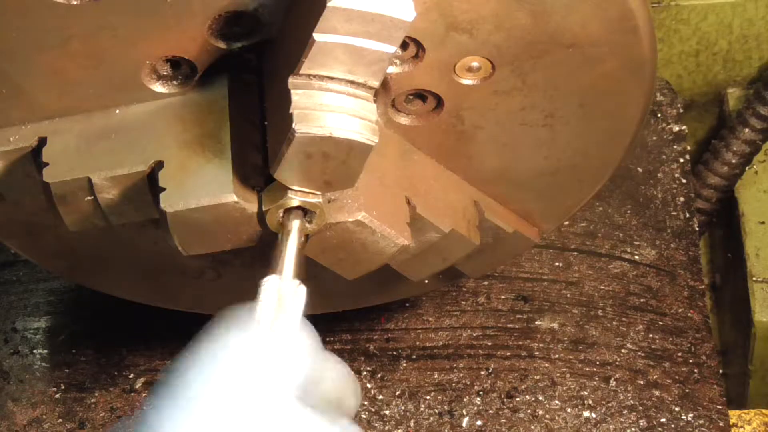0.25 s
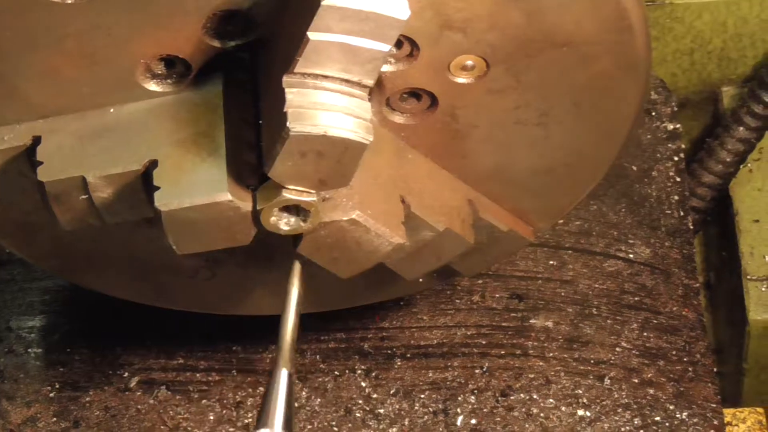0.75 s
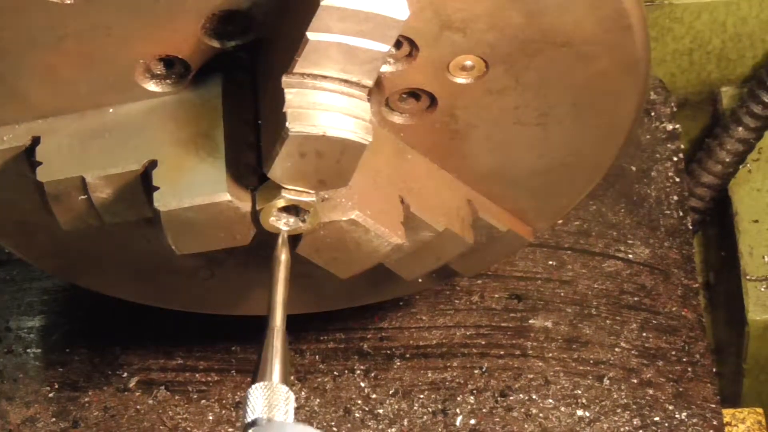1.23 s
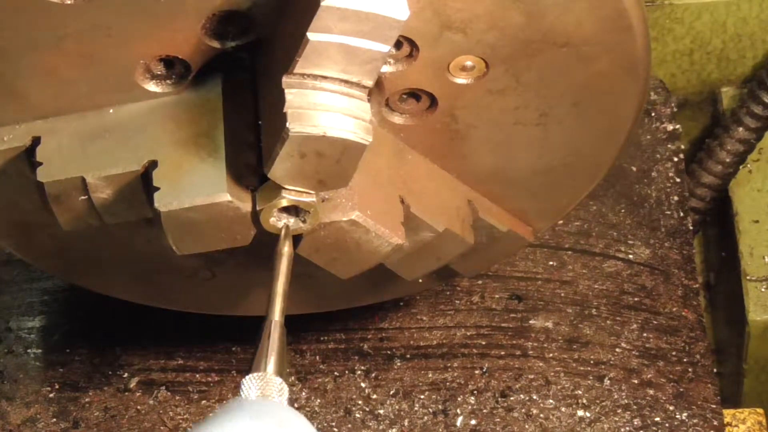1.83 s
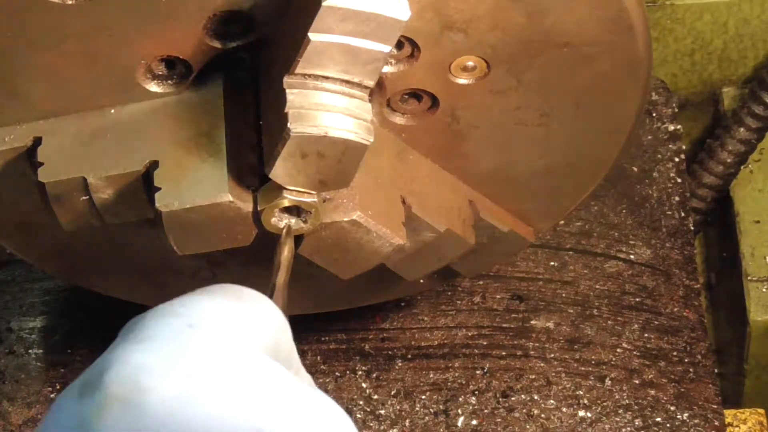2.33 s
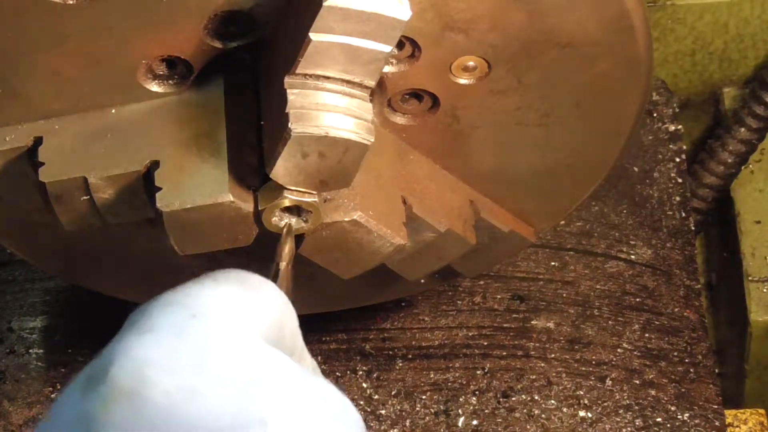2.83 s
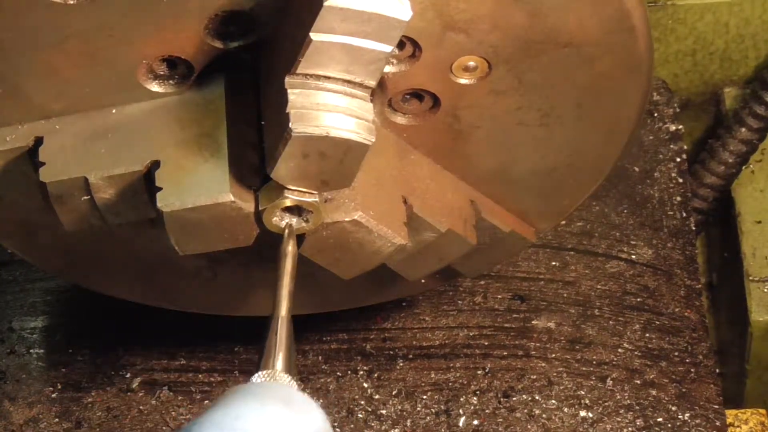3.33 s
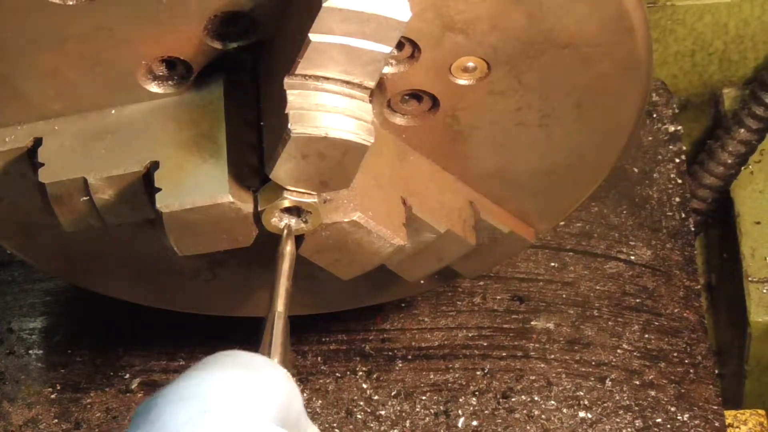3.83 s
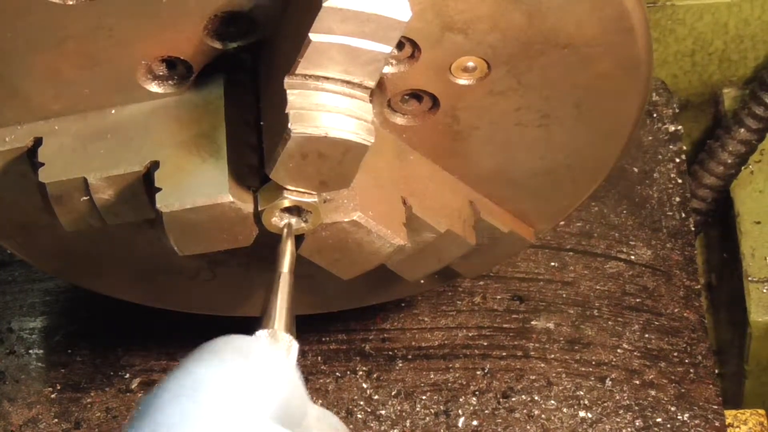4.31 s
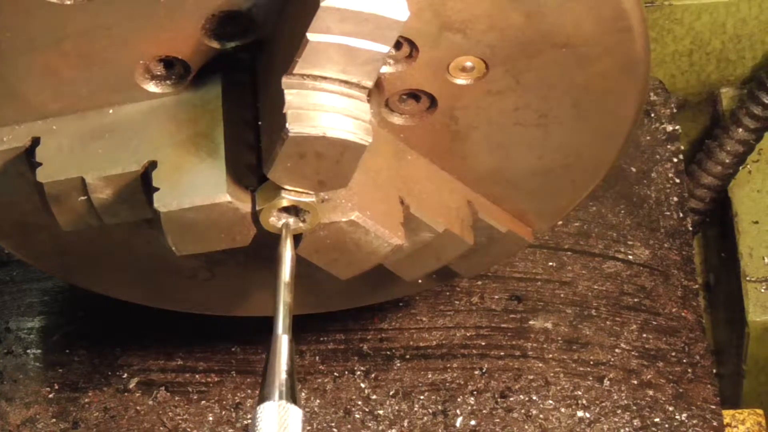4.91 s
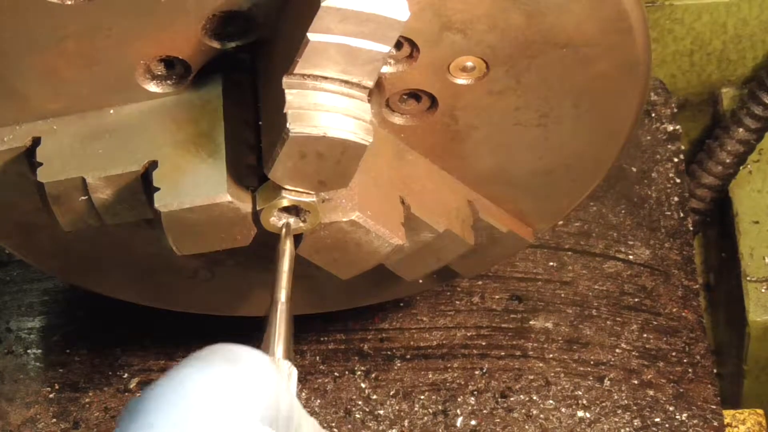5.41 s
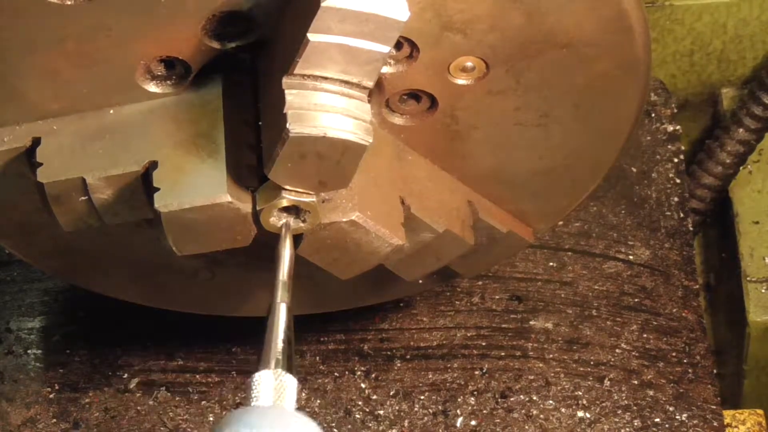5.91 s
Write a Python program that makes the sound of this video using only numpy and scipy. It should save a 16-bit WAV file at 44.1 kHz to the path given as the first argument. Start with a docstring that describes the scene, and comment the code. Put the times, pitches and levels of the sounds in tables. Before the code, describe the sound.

A sharp metallic crack comes early, with a low boom from the lathe bed, then a scrape, a tiny squeak and about a second of faint rattling motor buzz. Small steel taps lead to three more cracks, each followed by the spring clicking back and the shank clicking to its stop. Dull knocks and low hand rustle fill in, close up in a small room with faint hiss.

```python
"""Centre punch in a lathe chuck

An automatic centre punch fires four times on a steel piece: noise bursts through steel resonances.
Each snap rings the chuck (decaying sines and noise) and the small workshop (a diffuse noise tail).
Between snaps the spring resets with clicks, and the tip taps, rubs and squeaks as it is set down again.
A small motor, a train of resonant ticks, buzzes for a second and twice briefly, over air noise and hum."""
import sys
import numpy as np
from scipy import signal
from scipy.fft import rfft, irfft
from scipy.io import wavfile
from scipy.ndimage import uniform_filter1d

SR = 44100
rng = np.random.default_rng(int(sys.argv[2]) if len(sys.argv) > 2 else 0)


def wrap_up_sound(samples):
    """Save the sound to the file named by the first command line argument, as 16-bit audio."""
    columns = np.atleast_2d(samples).T
    # keep every value between -1 and 1, then stretch to whole-number steps
    tamed = np.clip(columns, -1, 1)
    steps = np.round(tamed * 32767).astype(np.int16)
    wavfile.write(sys.argv[1], SR, steps)


N = 271656
TIME = np.arange(N) / SR  # s

# All dB in the tables are relative to the other settings of their layer.
# Hammer blows. Each row: time in seconds, crack in dB, chuck ring in dB, lathe bed boom in dB,
# run-up of the sliding hammer in seconds, then colour in dB at 2, 4.2, 7 and 13.5 kHz.
SNAPS = [(0.3534, -3.5, -43, -49.5, 0.0007, 2.5, -8, 0.74, 4.9),
         (2.74, -5, -39, -61.5, 0.00085, -3, -0.5, -0.94, 9),
         (4.4177, -5, -38.5, -61, 0.00096, -3, -1.5, -0.63, 4.9),
         (5.709, -4.5, -36, -58, 0.00032, -0.5, -0.5, -0.94, 5.4)]
# Spectrum of the crack. Each row: frequency in Hz, density in dB per Hz.
CRACK_SPECTRUM = [(47, -49.5), (80, -15.5), (436, -11.5), (795, -11.5), (1700, -17.5), (3390, -7.5),
                  (3790, -11.5), (4140, -4), (5920, -10), (8080, 1), (9880, -3.5), (10600, -0.5),
                  (12900, -4.5), (15400, -17), (16500, -23)]
# Steel resonances of the punch. Each row: frequency in Hz, width in Hz, level in dB.
PUNCH_MODES = [(3430, 190, -11), (4160, 260, -9), (5150, 150, -10), (6450, 270, -7), (9280, 310, -4),
               (10640, 250, -1), (11820, 300, -2), (12780, 400, -3)]
RING_DEPTH = 1.8  # how far the steel resonances stand out of a contact

# Modes of the chuck and its jaws. Each row: frequency in Hz, level in dB, 60 dB decay time in seconds.
CHUCK_MODES = [(394, -3, 1.1), (459, -6, 1.0), (490, -7, .8), (575, -4, 1.0), (599, -6, .9), (637, -3, .9),
               (675, -2, .9), (735, -3, .6), (790, -4, .5), (852, 1, .5), (840, 15, .05), (972, -9, .5),
               (1068, -9, .5)]
# Dense modes of the headstock. Each row: frequency in Hz, density in dB per Hz.
CLANG_SPECTRUM = [(150, -32), (300, -16), (500, -9), (850, -1.5), (1050, -8.5), (1400, -13), (2200, -26),
                  (5000, -68.5)]
# Boom of the lathe bed. Each row: frequency in Hz, density in dB per Hz.
BOOM_SPECTRUM = [(30, -40), (80, -25), (135, 4.5), (190, -1.5), (300, -3), (450, -6.5), (800, -21.5),
                 (2000, -56.5)]
# Decay of clang and boom. Each row: frequency in Hz, 60 dB decay time in seconds.
RING_T60 = [(120, 4.4), (300, 2.5), (600, 0.71), (900, 0.18), (2000, 0.67)]

# The spring pushes the hammer back onto its catch. Each row: time in seconds, click in dB,
# click decay in seconds, bounce in dB, seating knock in dB.
RESETS = [(3.0198, -31, 0.0016, -49, -48), (4.6259, -27, 0.00068, -49, -46),
          (5.9303, -30, 0.0011, -43.5, -46.5)]
SEAT_S = .037  # the hammer seats this long after its click, bouncing evenly on the way
SEAT_DB, SEAT_HZ = -44, 650  # click of the seating hammer, centre of its knock
RESET_SLIDE_DB, RESET_SLIDE_S = -57, 0.014  # barrel rub just before seating: level, half length
# The shank slides out to its end stop. Each row: time in seconds, click in dB, click decay in seconds,
# slide in dB.
STOPS = [(3.262, -28.5, 0.002, -67), (4.8291, -32, 0.0036, -66), (6.1269, -29.5, 0.0026, -64)]
STOP_KNOCK_DB, STOP_KNOCK_HZ = -58.5, 734
RUN_OUT_S = 0.015  # the slide is loudest this long before the stop; also its half length
# Light taps of tip and sleeve. Each row: time in seconds, level in dB, tilt in dB per octave,
# treble edge in Hz.
TAPS = [(.1696, -58, 1, 9500), (0.3831, -34, -1, 12300), (.5085, -47, 1, 11500), (.5912, -58, -6.5, 13000),
        (1.0794, -47.5, -3.5, 10600), (1.162, -52.5, 2, 11000), (1.1735, -40, 3, 11480),
        (1.6183, -39, 5.5, 12100), (1.774, -44, 3.5, 10600), (2.0856, -38.5, 14, 8500),
        (2.2063, -63.5, 0, 10000), (2.51, -50, 4, 10480), (3.44, -60.5, -4, 12880),
        (3.816, -37.5, 19.5, 7400), (4.2549, -57, 2.5, 10500), (4.891, -50, 10.5, 12500),
        (4.956, -58, -3, 12150), (5.199, -55, 8, 8100), (5.289, -62.5, 10.5, 11500),
        (5.432, -63, 3.5, 11900), (6.0276, -54, 1, 11500)]
TAP_DECAY_S = 0.0027
# Spectrum shared by light contacts, weak below the punch's first resonance.
# Each row: frequency in Hz, density in dB per Hz.
CLICK_SPECTRUM = [(300, -12), (2300, -9), (3200, -0.5), (5000, -3.5), (7700, -2), (11000, -2.5),
                  (14000, -5.5), (16500, -4)]
# Dull knocks as the punch bears on the work. Each row: time in seconds, level in dB, centre in Hz.
KNOCKS = [(.168, -43, 434), (.382, -42, 484), (0.5076, -44, 690), (1.799, -60.5, 375.4),
          (2.086, -46.5, 840), (2.2056, -54.5, 992), (2.515, -51.5, 353), (3.817, -50, 840),
          (4.257, -56, 376), (5.609, -51.5, 450)]
KNOCK_CYCLES = 8.5  # a knock's main part falls to 1/e in this many cycles, so low ones last longer

# The shank rubs in its sleeve. Each row: loudest time in seconds, level in dB, half length in seconds.
RUBS = [(.508, -52.5, 0.015), (.87, -66, .07), (4.88, -62, 0.059)]
# Steel-on-steel friction. Each row: frequency in Hz, density in dB per Hz.
SCRAPE_SPECTRUM = [(1500, -35), (3300, 0.5), (5000, -3), (7000, 2), (11500, 0), (14000, -10),
                   (16000, -24.5)]
# Stick and slip of the tip. Each row: loudest time in seconds, level in dB, pitch then in Hz,
# half length in seconds.
SQUEAKS = [(0.506, -47, 3450, 0.0032), (0.621, -62.5, 4300, 0.017), (0.642, -50, 6500, 0.01),
           (.665, -43, 7400, 0.0061), (.672, -40.5, 10500, 0.0026), (.677, -41, 10700, 0.0029)]
SQUEAK_RISE_HZ_PER_S = 43000
# The hand shifts its weight on the machine. Each row: start in seconds, end in seconds, level in dB.
LEANS = [(0.513, 0.852, -56), (2.894, 3.084, -58.5), (4.71, 4.973, -58), (5.515, 5.68, -58.5)]
LEAN_RISE_DB_PER_S, LEAN_FALL_DB_PER_S = 77, 56
# Low rustle of the leaning hand. Each row: frequency in Hz, density in dB per Hz.
RUSTLE_SPECTRUM = [(30, -30.5), (80, -10), (115, -15), (137, 2.5), (200, -3), (270, -7.5), (450, -8.5),
                   (800, -19), (2000, -27), (6000, -39)]

# Runs of the small motor. Each row: start in seconds, end in seconds, level in dB.
MOTOR_RUNS = [(0.704, 1.66, -61.5), (2.905, 3.02, -66), (4.326, 4.41, -62)]
# Resonances of the motor housing. Each row: frequency in Hz, width in Hz, level in dB.
MOTOR_MODES = [(1320, 55, -4), (1580, 90, -8), (1950, 250, -6), (2200, 300, -7), (3100, 400, -7),
               (3500, 400, -1), (4250, 400, -2), (4950, 500, -4)]
REBOUND_S = 0.00371  # the rotor swings back this long after each step

# Decay of the room. Each row: frequency in Hz, 60 dB decay time in seconds.
ROOM_T60 = [(200, 0.19), (2000, 0.28), (5000, 0.28), (10000, 0.3), (15000, .2)]
# Colour of the room's echo. Each row: frequency in Hz, level in dB.
ROOM_COLOUR = [(100, -9.5), (1500, 4.5), (3000, 6), (6000, 2.5), (9000, -3), (12000, -3.5), (15000, -14.5)]
# Workshop air and hiss. Each row: frequency in Hz, density in dB per Hz.
FLOOR_SPECTRUM = [(20, -22), (50, -19), (80, -1), (130, -0.5), (400, 0.5), (1000, -6), (1570, -5),
                  (1800, -11), (2300, -12.5), (2800, -18.5), (6300, -20), (8500, -16.5), (12000, -14.5),
                  (16000, -22)]
FLOOR_DB = -64
# Mains hum. Each row: frequency in Hz, rms level in dB.
HUM = [(100, -79.5), (200, -75.5), (300, -83.5)]

# Likeness of the two channels in diffuse sound. Each row: frequency in Hz, correlation from 0 to 1.
ALIKE = [(30, .05), (60, .25), (120, .55), (500, .45), (1500, .3), (4000, .45), (15000, .15)]
# Phase between the microphone ports. Each row: frequency in Hz, lead of the left in radians.
PORT_PHASE = [(0, 0), (260, -0.9), (1720, 0.2), (8610, -0.2), (12900, -0.1), (14500, -0.3), (16500, 0.3)]
# Level between the microphone ports. Each row: frequency in Hz, left minus right in dB.
PORT_TILT = [(150, -1), (900, -2), (2400, -1), (5500, -.3), (10000, -1), (14000, -1.8)]
GLANCE_DB = -12.5  # reflections off the chuck, against the direct sound
EDGE_HZ = 16100  # upper band limit


def amp(db):
    """Level law: decibels to amplitude gain."""
    return 10 ** (np.asarray(db) / 20)


def evened(x):
    """Normalisation of power: scales to rms 1."""
    return x / np.sqrt(np.mean(x ** 2) + 1e-20)


def read(points, hz):
    """Interpolation of a table along a logarithmic frequency axis."""
    f, value = np.transpose(points)
    return np.interp(np.log(hz + 1), np.log(f + 1), value)


def add(mix, s, sound):
    """Superposition: adds a sound to the mix at time s."""
    part = mix[..., max(round(s * SR), 0):][..., :sound.shape[-1]]
    part += sound[..., :part.shape[-1]]


def bins(size):
    """Discrete spectrum: the frequencies of its bins in Hz."""
    return np.fft.rfftfreq(size, 1 / SR)


def coloured(x, points):
    """Linear filtering: weights the spectrum by a (Hz, dB) table."""
    return irfft(rfft(x) * amp(read(points, bins(x.shape[-1]))), x.shape[-1])


def diffuse(points, size, left_db=-0.7):
    """Diffuse field: coloured noise of rms 1, partly correlated between channels, left a little weaker."""
    a, b = rfft(rng.standard_normal((2, size)))
    alike = np.clip(read(ALIKE, bins(size)), -1, 1)
    left = amp(left_db) * a
    right = alike * a + np.sqrt(1 - alike ** 2) * b
    return evened(coloured(irfft(np.array([left, right]), size), points))


def dying(x, t60s):
    """Frequency-dependent damping: each band decays exponentially at its own rate."""
    hz, t, z = signal.stft(x, SR, nperseg=512)
    decay = amp(-60 * t / read(t60s, hz)[:, None])
    return signal.istft(z * decay, SR, nperseg=512)[1]


def contact(run_up, decay, rattle_db, rattle_decay, blow, size=4096, count=400):
    """Impact excitation: a scrape rises to the blow at sample count, then chatter decays."""
    t = (np.arange(size) - count) / SR
    before = 0.33 * np.exp(-abs(t) / run_up)
    after = np.exp(-abs(t) / decay) + amp(rattle_db) * np.exp(-abs(t) / rattle_decay)
    spike = blow * np.exp(-((t - .0001) / .00025) ** 2)
    shape = spike + np.where(t < 0, before, after)
    z = rfft(shape * rng.choice([-1., 1.], size))
    power = uniform_filter1d(abs(z) ** 2, size=80)
    # power evened across neighbouring bands, so the burst has a steady, flat colour
    return irfft(z * np.sqrt(power.mean() / power))


def steel(x, depth):
    """Modal resonance: one-pole resonators of the punch stand out of the sound and ring on briefly."""
    z = np.exp(-2j * np.pi * bins(len(x)) / SR)
    gain = 1 + 0 * z
    for hz, width, db in PUNCH_MODES:
        r = np.exp(-np.pi * width / SR)
        pole = r * np.exp(2j * np.pi * hz / SR)
        gain = gain + depth * amp(db) * (1 - r) / (1 - pole * z)
    return irfft(rfft(x) * gain / np.sqrt(np.mean(abs(gain) ** 2)))


def snaps(count=400):
    """Impulsive release: the hammer slips off its catch and strikes the pin, ringing the steel."""
    out = np.zeros(N)
    for s, db, _, _, run_up, *colour in SNAPS:
        blow = contact(run_up, decay=.0005, rattle_db=-9, rattle_decay=.0038, blow=.35)
        crack = coloured(steel(blow, depth=RING_DEPTH), CRACK_SPECTRUM)
        grip = [(900, 0), (2000, colour[0]), (4200, colour[1]), (5700, 0),
                (7000, colour[2]), (8300, 0), (11500, 0), (13500, colour[3])]  # (Hz, dB)
        add(out, s - count / SR, amp(db) * coloured(crack, grip))
    return out


def lathe(modes_db=-11, clang_db=-7, spread=.5):
    """Free vibration: each snap rings the same chuck and headstock modes, and the bed booms below."""
    out, t = np.zeros((2, N)), TIME[:2 * SR]
    clang = dying(diffuse(CLANG_SPECTRUM, size=2 * SR), RING_T60)
    for s, _, ring_db, boom_db, *_ in SNAPS:
        shared = rng.uniform(0, 2 * np.pi, (len(CHUCK_MODES), 1, 1))
        phases = shared + spread * rng.standard_normal((len(CHUCK_MODES), 2, 1))  # two channels
        modes = 0
        for (hz, db, t60), phase in zip(CHUCK_MODES, phases):
            modes = modes + amp(db - 60 * t / t60) * np.sin(2 * np.pi * hz * t + phase)
        boom = dying(diffuse(BOOM_SPECTRUM, size=2 * SR), RING_T60)
        add(out, s, amp(ring_db + modes_db) * modes)
        add(out, s, amp(ring_db + clang_db) * clang)
        add(out, s, amp(boom_db) * boom)
    return out


def click(s, db, tilt_db, edge_hz, decay, level_db=7, steepness=14,
          rattle_db=-16, rattle_decay=.012, count=400):
    """Contact stiffness: harder light contacts reach higher in the treble. Gives (start s, sound)."""
    burst = contact(0.00068, max(decay, .0003), rattle_db, rattle_decay, blow=0)
    tick = coloured(steel(burst, depth=RING_DEPTH), CLICK_SPECTRUM)
    hz = np.geomspace(3500, 16500, num=30)
    octaves = np.log2(hz / 8000)
    edge_loss_db = 10 * np.log10(1 + (hz / edge_hz) ** steepness)
    hardness = np.c_[hz, tilt_db * octaves - edge_loss_db]
    return s - count / SR, amp(db + level_db) * coloured(tick, hardness)


def resetting(count=3):
    """Spring return: the hammer clicks back over its catch, bounces twice and seats."""
    out = np.zeros(N)
    for s, db, decay, bounce_db, _ in RESETS:
        add(out, *click(s, db, tilt_db=5, edge_hz=12500, decay=decay))
        for k in range(1, count):
            bounce_s = s + SEAT_S * k / count
            add(out, *click(bounce_s, bounce_db, tilt_db=2, edge_hz=12200, decay=0.0016))
        add(out, *click(s + SEAT_S, SEAT_DB, tilt_db=-3.5, edge_hz=13000, decay=0.0011))
    return out


def tapping():
    """Light impact: the shank meets its end stop with a bright click; tip and sleeve tap besides."""
    out = np.zeros(N)
    for s, db, decay, _ in STOPS:
        add(out, *click(s, db, tilt_db=7, edge_hz=12100, decay=decay))
    for row in TAPS:
        add(out, *click(*row, decay=TAP_DECAY_S))
    return out


def knock(s, db, centre_hz, octaves=.9, top_db=-3, tail_db=-12, tail_decay=.08):
    """Soft impact: a slow blow reaches only the low modes of the chuck. Gives (start s, sound)."""
    t, hz = TIME[:SR // 2], np.geomspace(40, 16000, num=30)
    fall = np.exp(-t * centre_hz / KNOCK_CYCLES) + amp(tail_db) * np.exp(-t / tail_decay)
    shape = fall * (1 - np.exp(-t / .0008))  # soft onset
    away = np.log2(hz / centre_hz)
    hump_db = -10 * np.log10(1 + (away / octaves) ** 6) + top_db * np.maximum(away, 0)
    return s, amp(db) * shape * diffuse(np.c_[hz, hump_db], size=len(t))


def knocking():
    """Momentum transfer: the chuck is knocked by the bearing tip, seating hammer and stopping shank."""
    out = np.zeros((2, N))
    for row in KNOCKS:
        add(out, *knock(*row))
    for s, *_, db in RESETS:
        add(out, *knock(s + SEAT_S, db, SEAT_HZ))
    for s, *_ in STOPS:
        add(out, *knock(s, STOP_KNOCK_DB, STOP_KNOCK_HZ))
    return out


def sliding(grain_db=4.0):
    """Dry friction: grainy noise swells with each rub, before each end stop and as the hammer returns."""
    strokes = list(RUBS)
    strokes += [(s - RUN_OUT_S, db, RUN_OUT_S) for s, _, _, db in STOPS]
    strokes += [(s + SEAT_S - RESET_SLIDE_S / 2, RESET_SLIDE_DB, RESET_SLIDE_S) for s, *_ in RESETS]
    speed = sum(amp(db) / np.cosh(np.clip((TIME - s) / half, -20, 20)) for s, db, half in strokes)
    grains = amp(grain_db * evened(uniform_filter1d(rng.standard_normal(N), size=90)))
    rub = coloured(steel(grains * rng.standard_normal(N), depth=2.2), SCRAPE_SPECTRUM)
    return speed * evened(rub)


def squeak(width_hz=550, scrape_db=-3, size=4096):
    """Stick-slip friction: a narrow noise band rises in pitch, with a scrape that rings the punch."""
    out, t = np.zeros(N), (np.arange(size) - size // 2) / SR
    smooth = signal.butter(2, width_hz, fs=SR)
    for s, db, hz, half in SQUEAKS:
        a, b = signal.lfilter(*smooth, rng.standard_normal((2, size)))
        turns = np.cumsum(hz + SQUEAK_RISE_HZ_PER_S * t) / SR
        whistle = evened(((a + 1j * b) * np.exp(2j * np.pi * turns)).real)
        scrape = evened(coloured(steel(rng.standard_normal(size), depth=3.4), SCRAPE_SPECTRUM))
        swell = np.exp(-(t / half) ** 2)
        add(out, s + t[0], amp(db) * swell * (whistle + amp(scrape_db) * scrape))
    return out


def leaning(lumpy_db=2.5, size=3000):
    """Forced vibration: the hand stirs low resonances; each push swells, holds unevenly and dies away."""
    push = 0
    for start, end, db in LEANS:
        rise_db = LEAN_RISE_DB_PER_S * np.maximum(start - TIME, 0)
        fall_db = LEAN_FALL_DB_PER_S * np.maximum(TIME - end, 0)
        push = push + amp(db - rise_db - fall_db)
    lumps = amp(lumpy_db * evened(uniform_filter1d(rng.standard_normal(N), size=size)))
    return push * lumps * diffuse(RUSTLE_SPECTRUM, size=N)


def motor(uneven_db=2.0, limp_db=-3, rebound_db=1, rebound_hz=2300, chatter_db=-22, chatter_decay=0.012):
    """Periodic excitation: steps, strong and weak in turn, with rebound and gear chatter ring a housing."""
    steps, t = np.zeros(N), TIME[:2048]
    for start, end, db in MOTOR_RUNS:
        at = np.arange(start, end, 1 / 50)  # fifty steps a second
        steps[np.round(at * SR).astype(int)] = amp(db + limp_db * (np.arange(len(at)) % 2))
    steps = steps * amp(uneven_db * rng.standard_normal(N))
    dull = signal.butter(4, rebound_hz, fs=SR)
    rebound = signal.lfilter(*dull, np.roll(steps, round(REBOUND_S * SR)))
    tick = 0
    for hz, width, db in MOTOR_MODES:
        tick = tick + amp(db) * np.exp(-np.pi * width * t) * np.sin(2 * np.pi * hz * t)
    fading = signal.lfilter([1], [1, -np.exp(-1 / (chatter_decay * SR))], steps)
    chatter = fading * rng.standard_normal(N)
    drive = steps + amp(rebound_db) * rebound + amp(chatter_db) * chatter
    return signal.fftconvolve(drive, tick)[:N]


def ports(x, size=60):
    """Interchannel difference: two ports differ in phase and level; glances off the chuck differ too."""
    half = amp(read(PORT_TILT, bins(N)) / 2) * np.exp(.5j * read(PORT_PHASE, bins(N)))
    direct = irfft(rfft(x) * np.array([half, 1 / half]), N)
    glances = np.exp(2j * np.pi * rng.random(size + 1))  # flat spectrum, random phase
    side = amp(GLANCE_DB) * signal.oaconvolve(x, irfft(glances))[:N]
    return direct + np.array([side, -side])


def workshop(x, wet_db=-17, size=256, count=3):
    """Reverberation: the room stores each band's energy and returns a dense tail, count frames late."""
    hz, t, z = signal.stft(x, SR, nperseg=size)
    power = uniform_filter1d(abs(z) ** 2, size=7, axis=0)
    power = np.pad(power, ((0, 0), (count, 0)))[:, :len(t)]
    keep = amp(-60 * t[1] / read(ROOM_T60, hz)) ** 2  # energy kept from frame to frame
    stored = np.array([signal.lfilter([1 - k], [1, -k], p) for k, p in zip(keep, power)])
    noise = signal.stft(diffuse([(20, 0), (20000, 0)], size=N), SR, nperseg=size)[2]
    colour = amp(wet_db + read(ROOM_COLOUR, hz))[:, None]
    tail = noise / np.std(noise) * np.sqrt(abs(stored)) * colour
    return signal.istft(tail, SR, nperseg=size)[1][:, :N]


def background():
    """Stationary noise: air rippled by the room's standing waves, microphone hiss and mains hum."""
    hum = 0
    for hz, db in HUM:
        hum = hum + amp(db) * np.sqrt(2) * np.sin(2 * np.pi * (hz * TIME + rng.random()))
    hz = np.linspace(200, 2400, num=70)
    ripple_db = 2 * rng.standard_normal(len(hz)) * signal.windows.tukey(len(hz), .1)
    air = coloured(diffuse(FLOOR_SPECTRUM, size=N), np.c_[hz, ripple_db])
    return amp(FLOOR_DB) * air + hum


def scene():
    """Superposition of punch, lathe, room, hand, motor and background."""
    punch = snaps() + resetting() + tapping() + sliding() + squeak()
    return ports(punch) + workshop(punch) + lathe() + knocking() + leaning() + motor() + background()


def record(dry, low_cut_hz=50):
    """Band limitation: a low cut and a steep upper edge."""
    low_cut = signal.butter(2, low_cut_hz, "highpass", fs=SR, output="sos")
    band_limit = signal.firwin(201, EDGE_HZ, window=("kaiser", 9), fs=SR)
    return signal.oaconvolve(signal.sosfilt(low_cut, dry), band_limit[None], "same")


dry = scene()
out = record(dry)
wrap_up_sound(out)
```